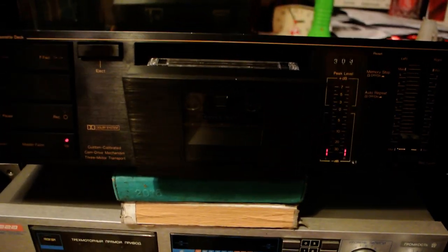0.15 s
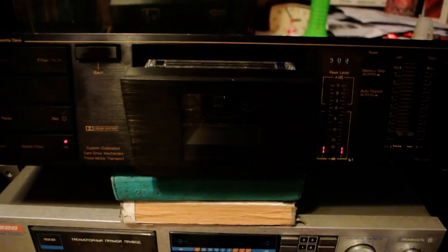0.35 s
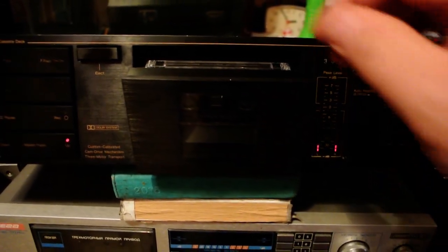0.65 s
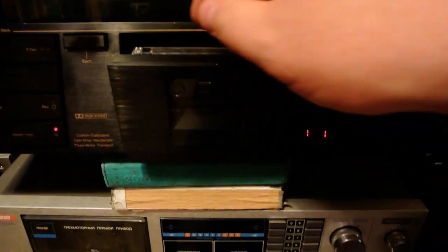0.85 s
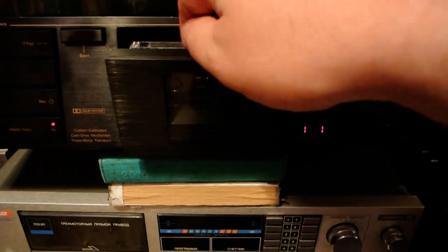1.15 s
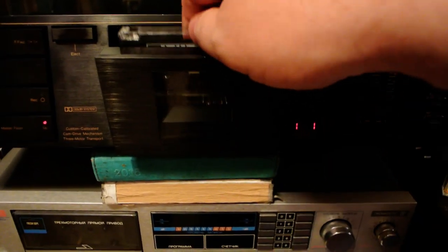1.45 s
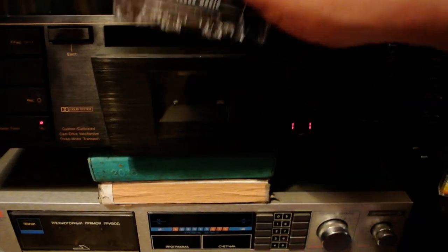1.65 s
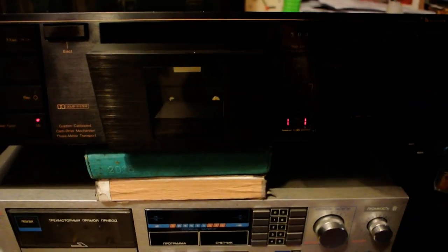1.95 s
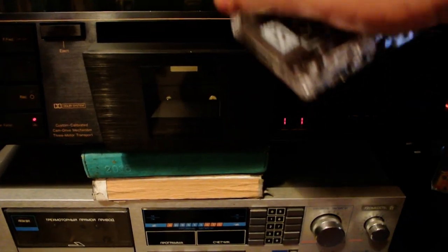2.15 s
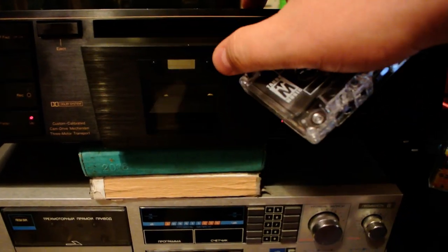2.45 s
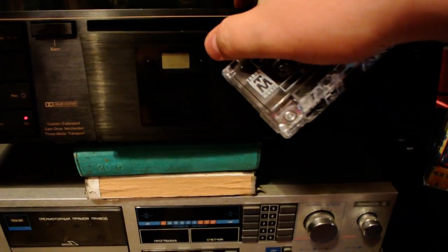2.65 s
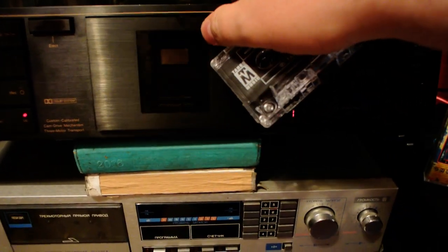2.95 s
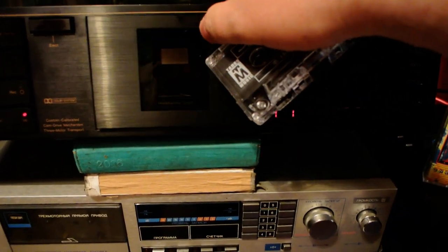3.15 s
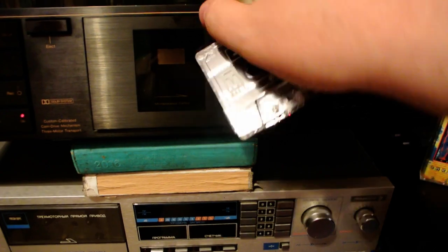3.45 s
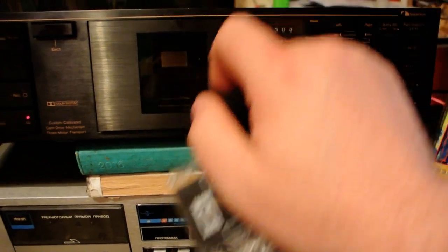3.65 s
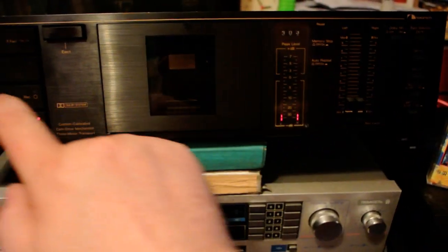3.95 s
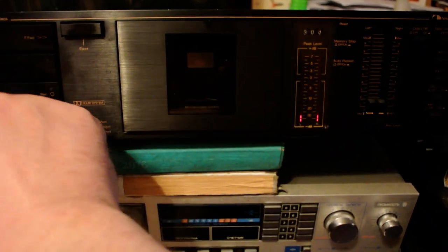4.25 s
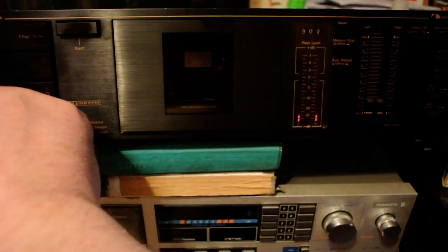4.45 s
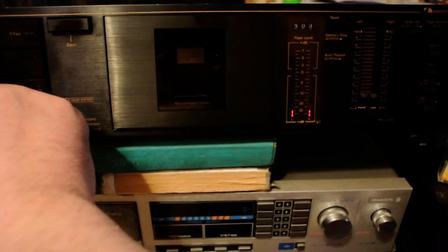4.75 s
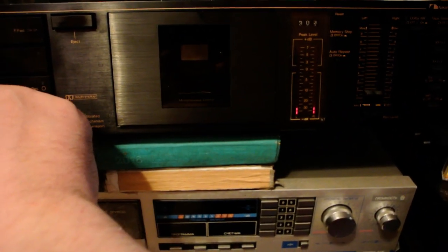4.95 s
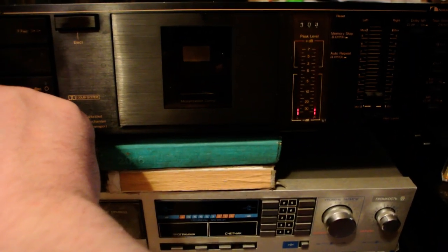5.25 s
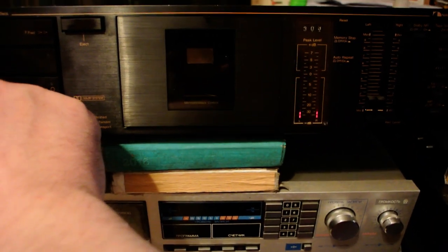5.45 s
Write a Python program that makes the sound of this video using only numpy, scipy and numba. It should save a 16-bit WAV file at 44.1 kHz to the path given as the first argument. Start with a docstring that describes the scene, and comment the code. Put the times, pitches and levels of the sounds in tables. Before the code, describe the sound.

A plastic cassette knocks lightly and scrapes in a tape deck's open holder, then clicks free and rattles briefly in the hand. The door is pushed shut with a sharp latch snap and a faint spring ring, followed by a soft knock as it is let go. Finally the cassette is put down with two sharp clacks. Heard close up in a small quiet room with a soft steady whir.

```python
"""Cassette out of a tape deck.

Close to a phone in a small quiet room, a cassette knocks and scrapes in the open door's holder,
then rattles in the hand. The door is pushed shut, latches and is let go; spring and cabinet ring on.
The cassette is put down with two sharp clacks. Blows ring each part's modes; sliding is stick-slip noise.
The phone's gain control ducks after the latch."""
import sys
import numpy as np
from scipy import signal
from scipy.fft import rfft, irfft, next_fast_len
from scipy.io import wavfile
from scipy.ndimage import uniform_filter1d
from numba import njit

SR = 44100
rng = np.random.default_rng(int(sys.argv[2]) if len(sys.argv) > 2 else 0)


def file_out(sig):
    """Save sig as 16-bit WAV at sys.argv[1]."""
    # one column per channel
    cols = np.atleast_2d(sig).T
    # limit, then scale
    lim = np.clip(cols, -1, 1)
    pcm = np.round(lim * 32767).astype(np.int16)
    wavfile.write(sys.argv[1], SR, pcm)


N = 247091
TIME = np.arange(N) / SR
RING_TIME = TIME[:SR // 4]

# edges of the five registers (thump, knock, clack, click, tick): f/Hz
REGISTER_EDGES_HZ = [150, 600, 1800, 4500, 9000, 15000]
# door touched, latched, let go: t/s, level/dB, tilt/(dB/oct), clack/dB, L-R/dB
DOOR_BLOWS = [(2.848, -62.5, -5.5, -11, -1.3), (3.1028, -19, 6, 1, 1.1), (3.3345, -45, -2.5, -1, -2.1)]


def holder_knocks():
    """The cassette knocks in the door's holder."""
    # knocks: t/s, level/dB, tilt/(dB/oct), clack/dB, L-R/dB
    knocks = [(1.04, -45, -2.5, -8, -1.6), (1.056, -62, -8.5, 6, -4), (1.229, -45, 0.1, 3.5, -2),
              (1.289, -43.5, -3.5, 9.5, -0.5), (1.328, -33, -0.5, 5.5, -2), (1.584, -38.5, -2, -3.5, -1),
              (1.603, -51, 8, 7, 3), (1.621, -46, -1, 0, 1), (1.671, -28, -0.6, 3, -1.5),
              (1.6995, -21, 2.1, -17, -2.5), (1.7045, -33, 7.5, 9.5, 1), (1.7215, -44, 8.5, 2, 0)]
    # holder modes: f/Hz, energy/dB, t60/s
    modes = [(288, -14.5, 0.1), (485, -13.5, 0.08), (897, -1, 0.034), (1057, -5.5, 0.039),
             (1256, -6, 0.078), (1375, -3.5, 0.048), (1990, -2, 0.014), (2310, 1.5, 0.046),
             (2645, 4, 0.035), (3290, 0, 0.041), (3730, -6, 0.017), (5000, -27, 0.027), (6400, -25, 0.022),
             (11300, -11, 0.028), (12900, -1, 0.025)]
    # weight per register: gain/dB
    colour_db = (-14, 2, 0, -3, -4)
    return struck(knocks, modes, colour_db, firm_contact_s=0.0017, lag_s=-14e-6,
                  ring_scale=1.1, crack_db=-7.5, dense_db=3.5, wet_db=-3.5)


def shell_rattles():
    """Loose reels and shell rattle in the hand."""
    # rattles: t/s, level/dB, tilt/(dB/oct), clack/dB, L-R/dB
    rattles = [(1.823, -23.5, -1.1, -8, -1.5), (1.8285, -38.5, 4.5, 5, 0), (2.003, -49.5, 5.2, 3.5, -7),
               (2.101, -29.4, 2.2, -5.3, -6), (2.11, -40.5, -5.5, -1, -8), (3.665, -42, -6, -14.5, -1.6)]
    # shell modes: f/Hz, energy/dB, t60/s
    modes = [(2540, -15, 0.071), (2950, -2, 0.024), (4266, -5.5, 0.031), (4200, -29, 0.043),
             (4600, -16, 0.039), (6970, -38, 0.033), (7530, 4.5, 0.021), (9900, -6, 0.014),
             (10340, -5, 0.015), (11418, -5.5, 0.04)]
    # weight per register: gain/dB
    colour_db = (-37, -24, 1, 2.5, -0.2)
    return struck(rattles, modes, colour_db, firm_contact_s=0.0044, lag_s=15e-6,
                  ring_scale=0.95, crack_db=0.5, dense_db=-26, wet_db=-7.5)


def door_blows():
    """The door rings as it is touched, latched and let go."""
    # door modes: f/Hz, energy/dB, t60/s
    modes = [(483, -9.5, 0.079), (912, -8.5, 0.09), (1183, -40, 0.083), (1348, -2.5, 0.077),
             (1830, -26, 0.041), (1960, -17, 0.099), (5210, -1, 0.015), (7200, -5, 0.012),
             (7560, 1.5, 0.023), (9700, -2, 0.016), (11400, -27, 0.015), (12700, -29, 0.015)]
    # weight per register: gain/dB
    colour_db = (-6.5, 7, -1, -3, -5)
    return struck(DOOR_BLOWS, modes, colour_db, firm_contact_s=0.0036, lag_s=-27e-6,
                  ring_scale=1.2, crack_db=5, dense_db=1, wet_db=0)


def set_down():
    """The cassette is put down: two hard contacts, two light ones between."""
    # contacts: t/s, level/dB, tilt/(dB/oct), clack/dB, L-R/dB
    contacts = [(5.069, -31.5, 4, 2, 1.5), (5.412, -57.5, -5, 3, -6), (5.445, -54, -2, 2, -1),
                (5.558, -24, 4, 4.5, 3)]
    # modes rung on landing: f/Hz, energy/dB, t60/s
    modes = [(163.5, -12, 0.19), (274, -9, 0.18), (570, -9.5, 0.049), (865, -6, 0.17), (2210, -10.5, 0.03),
             (2570, -1.5, 0.022), (4860, 3.5, 0.033), (6610, -4, 0.018), (8100, -3, 0.016),
             (10200, -19, 0.016), (10800, 8, 0.013), (13100, -10, 0.016), (13900, -5, 0.015)]
    # weight per register: gain/dB
    colour_db = (-7.4, -2.5, 0, -0.2, 0)
    return struck(contacts, modes, colour_db, firm_contact_s=0.00084, lag_s=-55e-6,
                  ring_scale=1.8, crack_db=3, dense_db=3.5, wet_db=-0.5)


def struck(blows, modes, colour_db, firm_contact_s, **voicing):
    """All blows on one part: each tilts its colour about the plastic's clack; gentle ones linger."""
    clack_hz, clack_width_oct = 3080, 0.82
    firm_db, db_per_doubling = -29.5, 8
    centres_hz = np.sqrt(np.multiply(REGISTER_EDGES_HZ[:-1], REGISTER_EDGES_HZ[1:]))
    octaves = np.log2(centres_hz / clack_hz)
    clack_hump = np.exp(-(octaves / clack_width_oct) ** 2)
    out = np.zeros((2, N))
    for start_s, db, tilt_db_oct, clack_db, pan_db in blows:
        levels_db = db + np.array(colour_db) + tilt_db_oct * octaves + clack_db * clack_hump
        contact_s = firm_contact_s * 2 ** ((firm_db - levels_db.max()) / db_per_doubling)
        add(out, start_s, blow(modes, levels_db, pan_db, contact_s, **voicing))
    return out


def blow(modes, levels_db, pan_db, contact_s, lag_s, ring_scale, crack_db, dense_db, wet_db):
    """One plastic blow: crack, dense ring and modes, each register levelled over its first 10 ms."""
    # decay per register: base ring t60/s, room t60/s, relative room level/dB
    decays = [(0.19, 0.26, 0.5), (0.11, 0.2, -15.5), (0.04, 0.21, -10.5), (0.037, 0.27, -12),
              (0.032, 0.2, -15.5)]
    detune, onset_samples = 0.0017, int(0.01 * SR)
    draws = rng.standard_normal((len(modes), 2))
    rung = unit(sum(np.sign(polarity) * undb(db) * unit(tone(hz * (1 + detune * offset), t60_s))
                    for (hz, db, t60_s), (offset, polarity) in zip(modes, draws)))
    crack = undb(crack_db) * burst(t60_s=0.0037)
    force = chatter(contact_s)
    out = 0
    registers = zip(REGISTER_EDGES_HZ, REGISTER_EDGES_HZ[1:], levels_db, decays)
    for lo_hz, hi_hz, db, (ring_t60_s, room_t60_s, room_db) in registers:
        crowding = min(hi_hz / 9000, 1) ** 0.5  # modes crowd only in the treble
        noise = crowding * (crack + undb(dense_db) * burst(ring_scale * ring_t60_s))
        body = unit(through(band(noise + rung, lo_hz, hi_hz), force))
        # the room hears all sides of the part, evening its modes out towards a click
        click = np.linalg.norm(noise) * (RING_TIME == 0)
        mode_share = 0.4 if hi_hz < 5000 else 0.2
        spread = unit(through(band(click + mode_share * rung, lo_hz, hi_hz), force))
        near, far = room(room_t60_s, room_db + wet_db)
        apart = min(hi_hz / 6000, 1) ** 0.51  # long waves reach both ports alike
        heard = ports(body, pan_db, lag_s) + through(body, apart * near)
        heard += through(spread, far + (1 - apart) * far[::-1])
        out += heard * undb(db) / np.sqrt(np.mean(heard[:, :onset_samples] ** 2))
    return out


def chatter(contact_s, slips_per_s=1800):
    """Contact force: a first touch, then dying slips."""
    sizes = rng.standard_normal(len(RING_TIME))
    slipping = rng.random(len(RING_TIME)) < slips_per_s / SR
    force = sizes * slipping * np.exp(-RING_TIME / contact_s)
    force[0] = 3.06
    return force


def after_ring(swell_s=0.0045, latch_db=5, let_go_db=2, low_thump_db=-45):
    """The latch plucks the door's spring, with a faint low thump; the cabinet booms then and on release."""
    # cabinet modes: f/Hz, relative level/dB, t60/s
    cabinet_modes = [(278.5, -37, 0.22), (304, -42, 0.34)]
    # spring modes: f/Hz, level/dB, t60/s
    spring_modes = [(4120, -44.5, 0.81), (4340, -54, 1), (4870, -57, 0.65)]
    _, latch_s, let_go_s = (row[0] for row in DOOR_BLOWS)
    swell = 1 - np.exp(-(RING_TIME / swell_s) ** 2)
    cabinet = swell * sum(undb(db) * tone(hz, t60_s) for hz, db, t60_s in cabinet_modes)
    spring = sum(undb(db) * tone(hz, t60_s, TIME[:SR]) for hz, db, t60_s in spring_modes)
    low_thump = undb(low_thump_db) * tone(hz=56, t60_s=0.075)
    out = np.zeros((2, N))
    add(out, latch_s, spring)
    add(out, latch_s, undb(latch_db) * cabinet + low_thump)
    add(out, let_go_s, undb(let_go_db) * cabinet)
    return out


def sliding(hiss_db=1, rasp_db=-2.5, pan_db=-1):
    """Smooth plastic hisses as it slides and rasps where pressed."""
    # strokes of plastic and fingers: t/s, length/s, relative peak hiss/dB, relative peak rasp/dB
    strokes = [(.95, 0.12, -53, -55), (1.12, 0.12, -52.5, -57), (1.27, 0.075, -51.5, -42),
               (1.41, 0.2, -44, -45), (1.6, 0.02, -51, -54), (1.78, 0.09, -44, -52),
               (1.89, 0.2, -41.5, -46.5), (2.15, .07, -50.5, -74), (5.41, 0.075, -49.5, -70)]
    hiss_env, rasp_env = sum(undb(peaks_db)[:, None] * stroke(start_s, length_s)
                             for start_s, length_s, *peaks_db in strokes)
    hiss = undb(hiss_db) * hiss_env * friction(lo_hz=3500, hi_hz=15500)
    rasp = undb(rasp_db) * rasp_env * friction(lo_hz=930, hi_hz=2800)
    return (hiss + rasp) * undb([[pan_db / 2], [-pan_db / 2]])


def stroke(start_s, length_s, grip_s=0.0067, swell_db=12, stop_t60_s=0.17):
    """Stroke envelope: takes hold, gathers speed, stops short."""
    remaining_s = start_s + length_s - TIME
    grip = np.clip((TIME - start_s) / grip_s, 0, 1)
    swell = undb(-swell_db * np.clip(remaining_s / length_s, 0, 1))
    return grip * swell * fade(stop_t60_s, np.maximum(-remaining_s, 0))


def friction(lo_hz, hi_hz, catch_db=2, slips_per_s=9000):
    """Tiny uneven slips, catching and freeing; each port hears its own echoes."""
    sizes = rng.standard_normal(N) * undb(2.2 * rng.exponential(size=N))
    slips = sizes * (rng.random(N) < slips_per_s / SR)
    catch = undb(catch_db * wander(window_samples=300))
    echoes = level(band(rng.standard_normal((2, N)), lo_hz, hi_hz), db=1.4)
    return level(level(band(slips, lo_hz, hi_hz)) * catch + echoes)


def squeaks(pitch_hz=1605):
    """Faint thin squeaks swell and fade."""
    # squeaks: t/s, length/s, level/dB
    events = [(2.9, 0.052, -54), (3.006, .04, -55), (5.19, 0.089, -58.5)]
    out = np.zeros((2, N))
    for start_s, length_s, db in events:
        arch = np.sin(np.pi * np.clip(RING_TIME / length_s, 0, 1))
        add(out, start_s, undb(db) * arch * np.sin(2 * np.pi * pitch_hz * RING_TIME))
    return out


def room(far_t60_s, far_db, near_t60_s=0.036, near_db=-6, gap_s=0.0007, build_s=0.01):
    """Echoes per port: quick scatter off stacked equipment, then the furnished room."""
    build_up = (1 - np.exp(-RING_TIME / build_s)) ** 2
    near = unit(np.array([burst(near_t60_s), burst(near_t60_s)]) * (RING_TIME > gap_s))
    far = unit(np.array([burst(far_t60_s), burst(far_t60_s)]) * build_up)
    return undb(near_db) * near, undb(far_db) * far


def room_tone(level_db=-48.5, waver_db=0.35, pan_db=-0.9):
    """Soft steady room whir under each microphone's own hiss."""
    # whir and hiss spectrum: f/Hz, relative density/dB
    spectrum = [(15, -28), (25, -7.5), (49, -8.5), (69, -12), (160, -10), (204, -4), (331, -6), (368, -7.5),
                (457, -2.5), (523, -7.5), (582, -2), (703, -6.5), (804, -4), (2770, -11), (15500, -15)]
    # left-right likeness: f/Hz, correlation
    likeness = [(60, 0.44), (400, 0.45), (900, 0.51), (1500, 0.03), (2800, 0.013)]
    log_hz = np.log(np.maximum(np.arange(N // 2 + 1) * SR / N, 1))
    colour_db, alike = (np.interp(log_hz, np.log(hz), values)
                        for hz, values in (np.transpose(spectrum), np.transpose(likeness)))
    mid, side = (irfft(rfft(rng.standard_normal(N)) * undb(colour_db) * np.sqrt(power), N)
                 for power in (1 + alike, 1 - alike))
    gain_db = waver_db * wander(window_samples=6000) + np.array([[pan_db], [-pan_db]]) / 2
    return level(np.array([mid + side, mid - side]), level_db) * undb(gain_db)


def ports(x, pan_db, lag_s):
    """Two microphone ports; the left is lag_s later and pan_db louder."""
    size = next_fast_len(len(x) + 64)
    delay = np.exp(-2j * np.pi * np.arange(size // 2 + 1) * SR / size * lag_s)
    left = irfft(rfft(x, size) * delay, size)[:len(x)]
    return np.array([left * undb(pan_db / 2), x * undb(-pan_db / 2)])


def burst(t60_s):
    """Decaying noise: modes too dense to tell apart."""
    return unit(rng.standard_normal(len(RING_TIME)) * fade(t60_s))


def tone(hz, t60_s, time=RING_TIME):
    """One decaying mode."""
    return np.sin(2 * np.pi * hz * time) * fade(t60_s, time)


def fade(t60_s, time=RING_TIME):
    """Exponential decay."""
    return np.exp(-np.log(1000) * time / t60_s)


def wander(window_samples):
    """Smoothed noise, rms 1."""
    return level(uniform_filter1d(rng.standard_normal(N), size=window_samples))


def band(x, lo_hz, hi_hz):
    """Causal band-pass."""
    return signal.sosfilt(signal.butter(3, [lo_hz, hi_hz], "band", fs=SR, output="sos"), x + 1e-18)


def through(x, response):
    """Convolve with a mono or stereo response."""
    return signal.fftconvolve(x if response.ndim == 1 else x[None], response, axes=-1)[..., :len(x)]


def undb(db):
    """Decibels to gain."""
    return 10 ** (np.asarray(db) / 20)


def unit(x):
    """Scale to energy 1."""
    return x / np.sqrt(np.sum(x ** 2, axis=-1, keepdims=True))


def level(x, db=0):
    """Scale to an rms level."""
    return x * undb(db) / np.sqrt(np.mean(x ** 2))


def add(out, start_s, sound):
    """Mix in at start_s."""
    start = int(start_s * SR)
    out[:, start:start + sound.shape[-1]] += sound[..., :N - start]


@njit
def follow(x, attack_s, release_s):
    """One-pole envelope follower."""
    out, envelope = np.empty(len(x)), 0.
    for i in range(len(x)):
        envelope += (x[i] - envelope) / (SR * (attack_s if x[i] > envelope else release_s))
        out[i] = envelope
    return out


def scene():
    """Cassette out, door shut, cassette down."""
    blows = holder_knocks() + shell_rattles() + door_blows() + set_down()
    return blows + after_ring() + sliding() + squeaks() + room_tone()


def record(dry, threshold_db=-17, ceiling_db=-1, top_hz=15900):
    """Phone: lagging gain control, clipper, steep low-pass."""
    envelope = follow(np.abs(dry).max(axis=0), attack_s=0.006, release_s=0.45)
    target_gain = np.minimum(1, undb(threshold_db) / (envelope + 1e-9))
    cut = follow(1 - target_gain, attack_s=0.06, release_s=0.06)
    clipped = np.clip(dry * (1 - cut), -undb(ceiling_db), undb(ceiling_db))
    return signal.sosfilt(signal.ellip(10, 0.2, 60, top_hz, fs=SR, output="sos"), clipped)


dry = scene()
out = record(dry)
file_out(out)
```